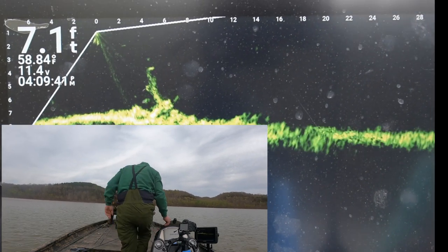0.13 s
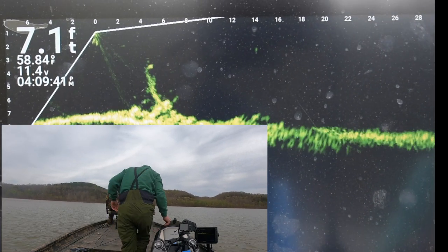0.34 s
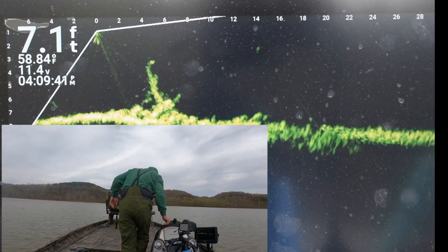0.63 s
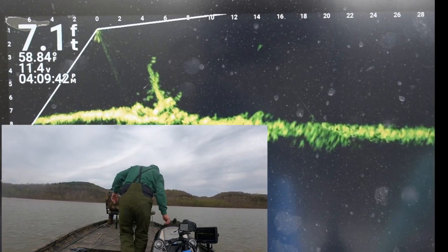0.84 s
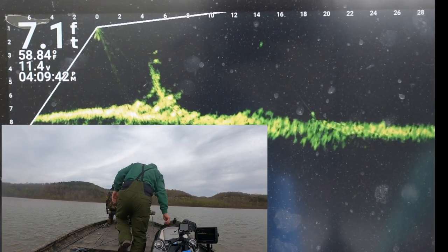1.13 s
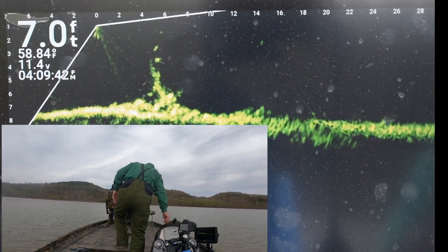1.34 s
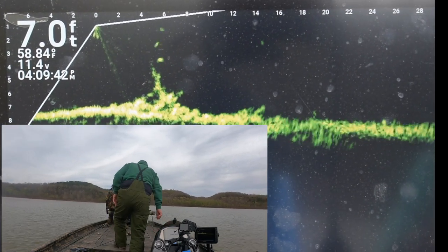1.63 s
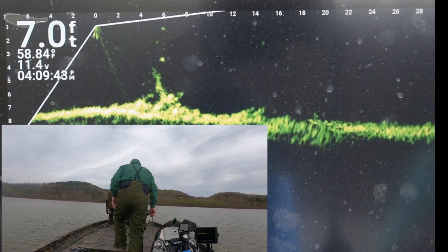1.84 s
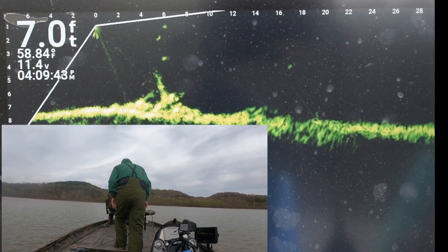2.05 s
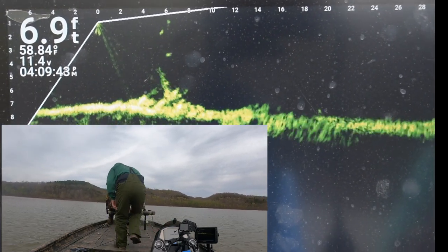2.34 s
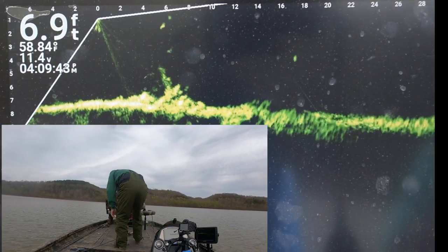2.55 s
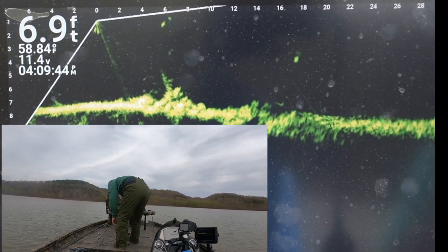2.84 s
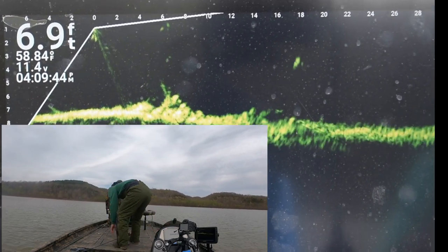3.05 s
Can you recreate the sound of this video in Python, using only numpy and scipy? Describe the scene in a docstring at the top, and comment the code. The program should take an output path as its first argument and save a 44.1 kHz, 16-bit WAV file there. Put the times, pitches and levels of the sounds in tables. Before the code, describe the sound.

Footsteps on a small fishing boat: cloth swish first, then dull hollow thuds, knocks and gritty scuffs, a last heavy thump near the end, over constant low rumble and gusty wind on the on-board microphone.

```python
"""Someone in waders walks forward over the hollow deck of a small fishing boat and bends down.
From the start the hull rumbles, wind buffets the two microphone ports and cloth swishes: shaped noise.
From 0.3 s soles scuff (resonant noise bursts) and from 0.4 s boots thump and knock (decaying modes and
noise bands), while small catches of grit and folds ring as noise under short decays.
Heavy wind buffets (short sine swings) come near 0.3-0.6 s and 2.5-2.7 s, a heavy double thump at 2.84 s."""
import sys
import numpy as np
from scipy import signal
from scipy.fft import rfft, irfft
from scipy.io import wavfile

SR = 44100
rng = np.random.default_rng(int(sys.argv[2]) if len(sys.argv) > 2 else 0)


def generate_wav(sig):
    """Save sig (samples, or channels by samples) to the path in sys.argv[1] as 16-bit PCM at SR."""
    pcm = np.round(np.clip(np.atleast_2d(sig).T, -1, 1) * 32767).astype(np.int16)
    wavfile.write(sys.argv[1], SR, pcm)


N = 141120  # samples, 3.2 s

# Hull rumble: spectral density (f/Hz, level/dB per Hz) and stereo spread (f/Hz, side level/dB)
HULL_SPECTRUM = [(20, -1.5), (45, 7), (65, -1.5), (100, -3.5), (200, -13.5), (400, -23), (800, -30.5),
                 (2000, -38.5), (5000, -47.5), (8000, -48), (11000, -73), (15000, -79)]
HULL_SIDE_LEVEL = [(50, -6), (130, -13), (400, -7), (1100, -4), (2500, -8), (6000, -16), (12000, -6)]
HULL_DB, HULL_SWELL_DB, HULL_SWELL_HZ = -45.5, 2, 4

# Wind turbulence: level before gusts and pan (t/s, level/dB), spectral density (f/Hz, level/dB per Hz)
WIND_LEVEL = [(0, -42.5), (.08, -36), (.2, -35), (.34, -27.5), (.41, -39), (.5, -32.5), (.57, -32.5),
              (.66, -41.5), (.78, -36), (.95, -33), (1.2, -51), (1.38, -37), (1.62, -60), (1.85, -38.5),
              (2.15, -41.5), (2.28, -32), (2.46, -42.5), (2.57, -27.5), (2.7, -22.5), (2.82, -37.5),
              (3, -36.5), (3.2, -38)]
WIND_SPECTRUM = [(12, -2.5), (28, 8), (42, -2.5), (60, -0.5), (80, -7), (130, -13), (220, -24.5),
                 (400, -39), (900, -70)]
WIND_SHARED_POWER = 0.52  # fraction of the power common to both ports
WIND_PAN_DB, GUST_DB, GUST_HZ = -2.5, 3, 37  # left minus right; spread and rate of the gusts
# Single heavy buffets: (t/s, f/Hz, sine level before the envelope/dB, left minus right/dB)
WIND_BUFFETS = [(0.329, 88, -23.5, -5), (0.36, 70.6, -26.5, 20.5), (0.477, 46.4, -11.5, -7),
                (0.508, 45.6, -22, -9), (0.564, 66, -25.5, -8), (2.534, 29.8, -20.5, -7),
                (2.583, 44.5, -15.5, -6.5), (2.681, 53, -23, -16), (2.704, 62, -22.5, -14)]
BUFFET_CYCLES = 0.36  # standard deviation of the Gaussian envelope, in cycles

# Swish of the wader cloth: (t/s, level/dB)
SWISH_LEVEL = [(0, -50), (.08, -46), (.16, -49.5), (.225, -52), (.25, -67.5), (.36, -73.5), (.45, -57.5),
               (.54, -75.5), (.65, -64.5), (.77, -54), (.84, -55.5), (.92, -45.5), (1.02, -56.5),
               (1.08, -54.5), (1.13, -66.5), (1.38, -63), (1.53, -69), (1.68, -82.5), (1.84, -62),
               (1.92, -70), (2.08, -65.5), (2.2, -59), (2.27, -49.5), (2.4, -58), (2.47, -52.5),
               (2.54, -50), (2.62, -65), (2.68, -59.5), (2.74, -70), (2.81, -72.5), (3.02, -72),
               (3.13, -66.5), (3.2, -68.5)]
# Gain on the cloth's lower rubbing relative to its hiss: (t/s, level/dB)
RUB_LEVEL = [(0, -9.5), (.2, -3), (.7, 2.5), (1.2, 6), (1.8, 4.5), (2.25, 8), (2.5, 1), (3.2, 13)]
# Cloth noise: spectral density (f/Hz, level/dB per Hz) and stereo spread (f/Hz, side level/dB)
CLOTH_SPECTRUM = [(250, -8), (600, -2), (1200, -1), (2300, -2), (4000, -1), (6000, -2), (7700, -4),
                  (8400, -10), (10500, -16), (12300, -16), (15000, -29)]
CLOTH_SIDE_LEVEL = [(400, -20), (1800, -18), (3500, -28), (8000, -29), (10000, -14), (13000, -5)]
RUB_CUTOFF_HZ, CLOTH_GRAIN_DB, CLOTH_GRAIN_HZ = 1850, 1, 64

# Grit and folds that catch: spectral density (f/Hz, level/dB per Hz)
GRIT_SPECTRUM = [(200, -10), (600, 0), (1400, 0), (2800, -4), (4500, -6), (8000, -14), (14000, -34)]
GRIT_PER_S, GRIT_DB, GRIT_T60_S, GRIT_SPREAD_DB = 65, -9.5, 0.052, 2

# Sole scuffs and squeaks: (t/s, length/s, f/Hz, bandwidth/Hz, level/dB)
SOLE_SCUFFS = [(.277, .036, 2770, 624, -51.5), (0.669, 0.17, 433, 153, -45.5), (.714, 0.015, 402, 92, -34),
               (0.711, 0.015, 960, 390, -44.5), (0.773, 0.025, 1800, 350, -46), (.795, 0.12, 480, 294, -48),
               (0.856, 0.03, 630, 497, -40.5), (1.074, 0.016, 690, 295, -36.5),
               (.912, 0.019, 4270, 500, -43), (1.156, 0.1, 1230, 410, -53.5),
               (1.212, 0.038, 1550, 300, -49), (1.341, 0.038, 1200, 290, -45.5),
               (1.367, 0.05, 1140, 450, -53.5), (1.742, 0.028, 655, 178, -43.5),
               (1.793, 0.037, 1880, 500, -50), (2.161, 0.057, 1060, 395, -44.5),
               (2.247, 0.27, 1150, 695, -54.5), (2.461, 0.063, 396, 198, -45),
               (2.647, 0.037, 1560, 1000, -52.5), (2.671, 0.033, 746, 453, -47.5),
               (2.696, 0.016, 4340, 250, -44.5), (2.953, 0.017, 5970, 795, -57.5),
               (2.997, 0.016, 1560, 593, -57), (3.116, 0.027, 2185, 675, -48.5)]
# Stereo spread of scuffs and grit: (f/Hz, side level/dB)
SCUFF_SIDE_LEVEL = [(400, -18), (1500, -15), (6000, -20)]
SCUFF_RISE = 0.21  # time to the peak, as a share of the length
SCUFF_ROUGH_DB, SCUFF_ROUGH_HZ = 2.5, 147  # flutter of the grip
SCUFF_SKIRT = 0.97  # exponent: steepness of the resonance

# Boot blows on the deck: (t/s, then level/dB of boom, body, box, knock, click and top,
# then decay-time factor [-])
BOOT_BLOWS = [(.413, -27, -24, -38.5, -43.5, -46.5, -68, 1.7),
              (.419, -28.5, -27.5, -34, -41, -44, -48, 1.6), (.436, -39, -35, -42, -36, -51, -69, 0.64),
              (.467, -26, -28, -38, -48, -60, -74, 0.79), (0.48, -32, -35, -38, -36.5, -38.5, -52, 0.98),
              (.757, -31, -39, -50, -51, -49, -57, 0.57), (.788, -66, -59, -50, -52, -54, -44, 0.76),
              (.915, -33, -61, -58, -40, -44.5, -59, 0.99), (0.93, -78, -29.5, -30, -35, -40, -75, 0.9),
              (0.962, -35, -40, -52, -50, -49, -58, 0.87), (1.054, -32.5, -67, -50, -48, -44.5, -50, 0.64),
              (1.076, -85, -57, -41, -49, -55.5, -65, 1.6), (1.217, -53, -58, -57, -46.5, -57, -102, 1.9),
              (1.247, -64, -47, -57, -50.5, -55, -87, 0.8), (1.385, -45, -57, -58.5, -49, -54, -61, 0.65),
              (1.758, -72, -22, -35, -29, -59, -55, 1.07),
              (1.763, -45.5, -19.5, -36, -32.5, -54, -56.5, 1.35),
              (1.938, -48, -25.5, -33, -36, -36, -46, 1.18), (2.08, -60, -65, -59, -39, -64, -74, 0.22),
              (2.249, -27.5, -45, -43.5, -40.5, -48.5, -64, 0.87),
              (2.697, -29.5, -48, -54, -49.5, -51, -48.5, 1.06),
              (2.714, -48, -59, -61, -56, -48, -57, 0.31), (2.842, -17.5, -20, -23, -34, -45.5, -53, 0.89),
              (2.849, -18.5, -33, -35.5, -37, -34.5, -35, 1.75), (2.884, -42, -29, -45, -65, -51, -53, 1.5),
              (3.004, -55, -55, -61, -61, -77, -80.5, 0.27), (3.1, -39, -43, -52, -54, -55.5, -58.5, 0.98)]
# Frequencies of those six levels: (f/Hz)
BLOW_ZONES = [60, 190, 420, 950, 3500, 7500]
# Deck and hull modes: (f/Hz, level/dB, t60/s before the blow's decay-time factor)
DECK_MODES = [(61.3, -2, 0.34), (95.4, -2.5, 0.26), (132.4, -1, 0.16), (162.6, -7, 0.17), (203.7, -8, 0.25),
              (237.5, -4.5, 0.21), (290, -10, 0.21), (382, -12, 0.21), (418.4, -15.5, 0.22),
              (580.5, -13, 0.13), (677.7, -6.5, 0.12), (1203, -12.5, 0.097), (1613, -12.5, 0.13),
              (2524, -8.5, 0.054), (3920, -2.5, 0.039)]
# Dense ringing of panels and fittings: (f/Hz, level/dB, t60/s before the blow's decay-time factor)
PANEL_RINGING = [(194, -12, .17), (413, -12, 0.3), (567, -2, 0.14), (800, -8.5, 0.18), (1200, -2.5, 0.12),
                 (2190, -3.5, 0.096), (3860, 0, 0.071), (7200, 1, 0.037), (9330, -13.5, 0.063),
                 (14000, -25, .05)]
# Stereo spread of the blows' dense ringing: (f/Hz, side level/dB)
BLOW_SIDE_LEVEL = [(200, -18), (900, -15), (4000, -11), (8000, -12), (13000, -6)]
CONTACT_S = 0.0014  # time constant of the onset
CRACK_DB, CRACK_S = 0, 0.0066  # extra level that fades after the onset, and its time constant
MODE_DETUNE, RATTLE_DB = 0.0085, -3.5  # spread of mode frequency as a fraction; level of the wash

# Response of the left port: (f/Hz, level/dB)
LEFT_PORT_RESPONSE = [(9000, 0), (11000, -1), (13000, -3.5)]
TOP_HZ, DECK_PAN_DB = 15000, -0.5  # upper band limit; left minus right of all boat sounds


def undb(db):
    """Level definition: an amplitude ratio is 10 to the power dB/20."""
    return 10 ** (np.asarray(db) / 20)


def unit(x):
    """Normalisation to a root-mean-square amplitude of 1."""
    return x / np.sqrt(np.mean(x ** 2) + 1e-20)


def pan(db):
    """Level difference between ears: left minus right in dB, split evenly."""
    return undb(np.array([[db], [-db]]) / 2)


def bins_hz(size):
    """Discrete spectrum: frequencies of the Fourier bins, at least 1 Hz."""
    return np.maximum(np.arange(size // 2 + 1) * SR / size, 1)


def curve(points):
    """Amplitude envelope: levels joined linearly in dB over time."""
    return undb(np.interp(np.arange(N) / SR, *np.array(points).T))


def colour(points):
    """Spectral envelope: levels joined linearly in dB over log frequency."""
    f, db = np.array(points).T
    return lambda hz: undb(np.interp(np.log(hz), np.log(f), db))


def filtered(x, gain):
    """Linear filtering: each Fourier component is scaled by gain(Hz)."""
    return irfft(rfft(x) * gain(bins_hz(len(x))), len(x))


def noise(gain, size):
    """Coloured random noise: white noise filtered by gain(Hz), with rms 1."""
    return unit(filtered(rng.standard_normal(size), gain))


def wide(gain, size, side):
    """Diffuse field: central noise plus an independent, opposite-signed part at the side levels."""
    spread = filtered(noise(gain, size), colour(side))
    return noise(gain, size) + spread * np.array([[1], [-1]])


def flutter(rate, size):
    """Random modulation: a wobble of rms 1 whose spectrum falls away above rate in Hz."""
    return noise(lambda hz: 1 / (1 + (hz / rate) ** 2), size)


def add(out, start, x):
    """Superposition: sum x into out from start in seconds."""
    i = max(int(start * SR), 0)
    out[:, i:i + x.shape[1]] += x[:, :max(N - i, 0)]


def hull():
    """Broadband structural vibration: low rumble whose level slowly swells and eases at random."""
    level_db = HULL_DB + HULL_SWELL_DB * flutter(HULL_SWELL_HZ, N)
    return undb(level_db) * wide(colour(HULL_SPECTRUM), N, HULL_SIDE_LEVEL)


def wind():
    """Turbulent pressure: low noise partly correlated between ports, with push-pull buffets."""
    shape, t = colour(WIND_SPECTRUM), np.arange(N) / SR
    common = noise(shape, N)
    separate = np.array([noise(shape, N), noise(shape, N)])
    ports = np.sqrt(WIND_SHARED_POWER) * common + np.sqrt(1 - WIND_SHARED_POWER) * separate
    gusts = undb(GUST_DB * flutter(GUST_HZ, N))
    out = ports * curve(WIND_LEVEL) * gusts * pan(WIND_PAN_DB)
    for centre, hz, db, pan_db in WIND_BUFFETS:
        cycles = (centre - t) * hz
        envelope = np.exp(-0.5 * (cycles / BUFFET_CYCLES) ** 2)
        out += undb(db) * pan(pan_db) * np.sin(2 * np.pi * cycles) * envelope
    return out


def waders():
    """Sliding friction of cloth on cloth: a grainy hiss over a duller rub."""
    grain = undb(CLOTH_GRAIN_DB * flutter(CLOTH_GRAIN_HZ, N))
    cloth = wide(colour(CLOTH_SPECTRUM), N, CLOTH_SIDE_LEVEL) * grain
    lowpass = signal.butter(2, RUB_CUTOFF_HZ, fs=SR, output="sos")
    rub = signal.sosfiltfilt(lowpass, cloth)
    hiss = cloth - rub
    return curve(SWISH_LEVEL) * (hiss + rub * curve(RUB_LEVEL))


def grit(size=4096):
    """Random impulsive contact: tiny catches that follow the cloth's level, each briefly decaying."""
    struck = rng.random(N) < GRIT_PER_S / SR
    catches = struck * undb(GRIT_SPREAD_DB * np.clip(rng.standard_normal(N), -2, 2))
    # powers add, so the decay is that of power
    power_decay = np.exp(-2 * np.log(1000) * np.arange(size) / SR / GRIT_T60_S)
    power = signal.fftconvolve(catches ** 2, power_decay)[:N]
    envelope = unit(np.sqrt(np.abs(power)))
    stride = curve(SWISH_LEVEL) * curve(RUB_LEVEL)
    return undb(GRIT_DB) * stride * envelope * wide(colour(GRIT_SPECTRUM), N, SCUFF_SIDE_LEVEL)


def scuffs(size=8192):
    """Stick-slip friction: a gripping and slipping rubber sole sounds one broad resonance of noise."""
    out, t = np.zeros((2, N)), np.arange(size) / SR
    for start, length, centre, width, db in SOLE_SCUFFS:
        def resonance(hz):
            detuning = (hz / centre - centre / hz) * centre / width
            return (1 + detuning ** 2) ** -SCUFF_SKIRT
        rub = wide(resonance, size, SCUFF_SIDE_LEVEL)
        age = t / (length * SCUFF_RISE)
        envelope = age * np.exp(1 - age)  # peaks at 1 when age is 1
        rough = undb(db + SCUFF_ROUGH_DB * flutter(SCUFF_ROUGH_HZ, size))
        add(out, start, rub * envelope * rough)
    return out


def footfalls(size=16384):
    """Modal excitation by impact: each blow rings deck modes and a dense wash of panel resonances."""
    out, t = np.zeros((2, N)), np.arange(size) / SR
    f, db, t60 = np.array(PANEL_RINGING).T
    centres = 200 * 2 ** (np.arange(13) / 2)  # half-octave bands, Hz
    bands = [wide(lambda hz: 1 / np.sqrt(1 + (4 * np.log2(hz / c)) ** 8), N, BLOW_SIDE_LEVEL)
             for c in centres]
    band_db = np.interp(np.log(centres), np.log(f), db)
    band_t60 = np.interp(np.log(centres), np.log(f), t60)
    contact = (1 - np.exp(-t / CONTACT_S)) * (1 + undb(CRACK_DB) * np.exp(-t / CRACK_S))
    for start, *zones, length in BOOT_BLOWS:
        def ring(hz, level_db, seconds):
            """Free decay: 60 dB in the scaled t60, at the blow's strength for this frequency."""
            strength_db = np.interp(np.log(hz), np.log(BLOW_ZONES), zones)
            return undb(level_db + strength_db) * np.exp(-np.log(1000) * t / (seconds * length))
        modes, wash = np.zeros(size), np.zeros((2, size))
        for hz, level_db, seconds in DECK_MODES:
            detuned_hz = hz * (1 + MODE_DETUNE * rng.standard_normal())
            turn = rng.random()  # starting phase in cycles
            modes += ring(hz, level_db, seconds) * np.sin(2 * np.pi * (detuned_hz * t + turn))
        i = rng.integers(N - size)  # a fresh stretch of the noise bands for each blow
        for band, hz, level_db, seconds in zip(bands, centres, band_db, band_t60):
            wash += band[:, i:i + size] * ring(hz, level_db, seconds)
        add(out, start, contact * (modes + undb(RATTLE_DB) * wash))
    return out


def scene():
    """Superposition: the boat's sounds, panned together, add to the wind at the ports."""
    boat = hull() + waders() + grit() + scuffs() + footfalls()
    return wind() + boat * pan(DECK_PAN_DB)


def record(dry):
    """Band limitation: the left port is a little duller, and both channels are cut above TOP_HZ."""
    padded = np.pad(dry[0], (0, N))  # keeps the filter from wrapping round
    left = filtered(padded, colour(LEFT_PORT_RESPONSE))[:N]
    lowpass = signal.ellip(8, 0.2, 70, TOP_HZ, fs=SR, output="sos")
    return signal.sosfilt(lowpass, np.array([left, dry[1]]))


dry = scene()
out = record(dry)
generate_wav(out)
```